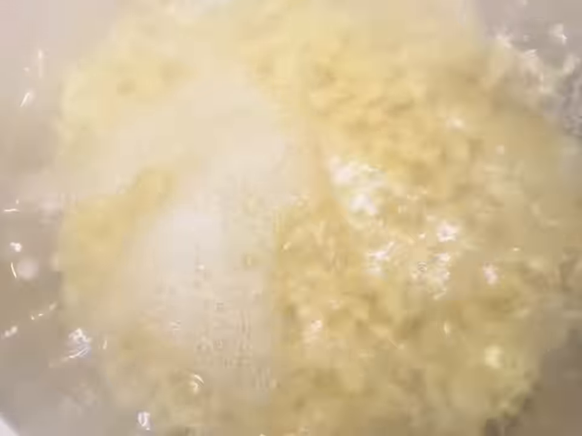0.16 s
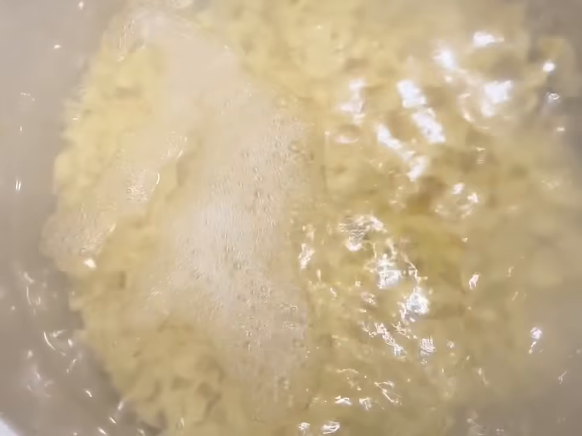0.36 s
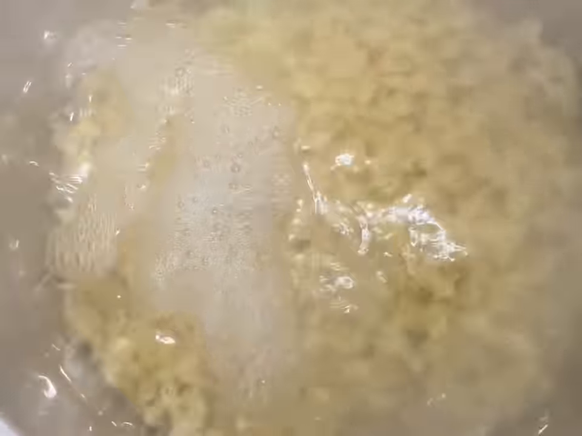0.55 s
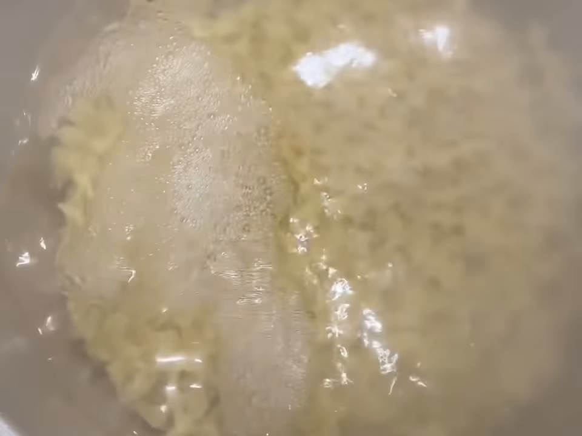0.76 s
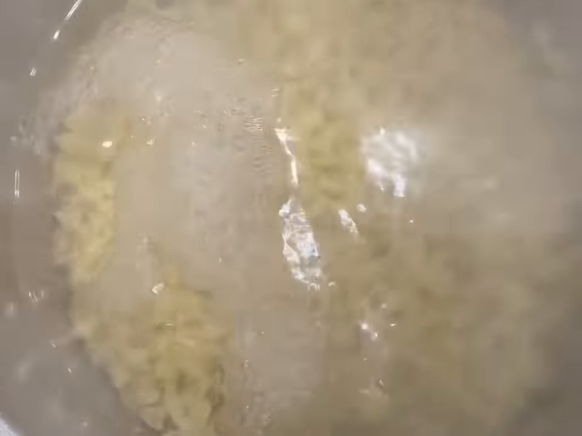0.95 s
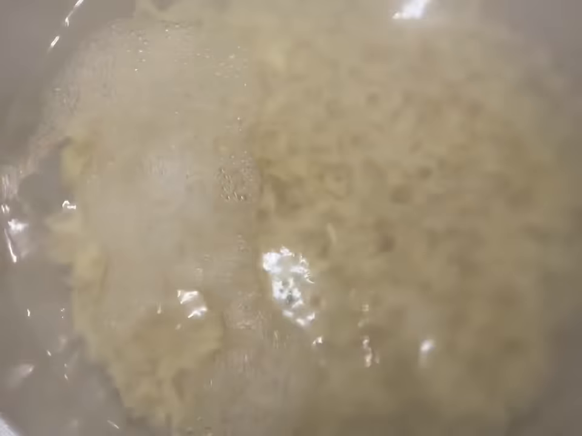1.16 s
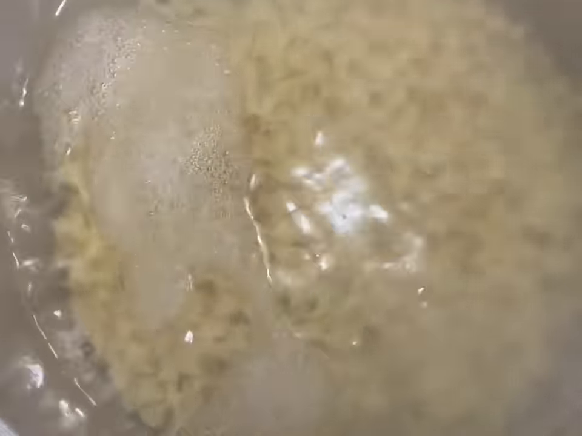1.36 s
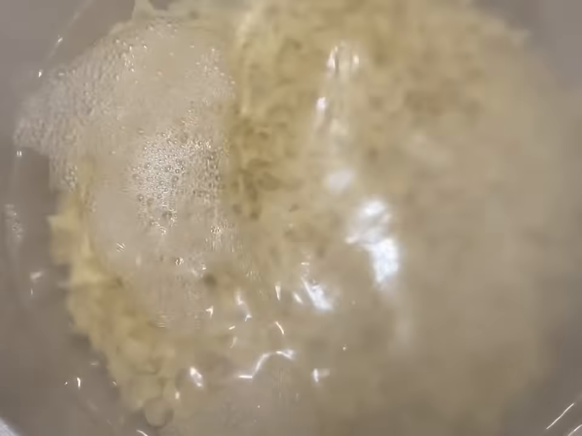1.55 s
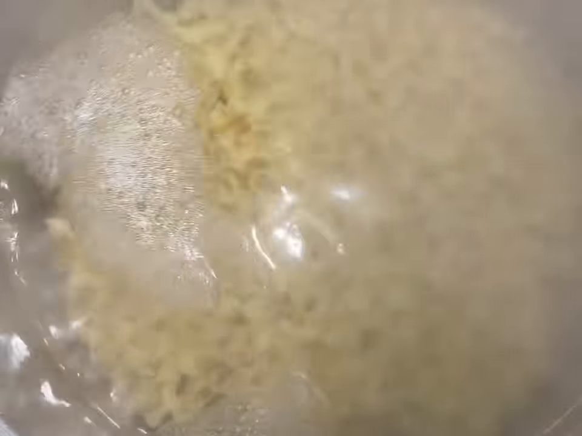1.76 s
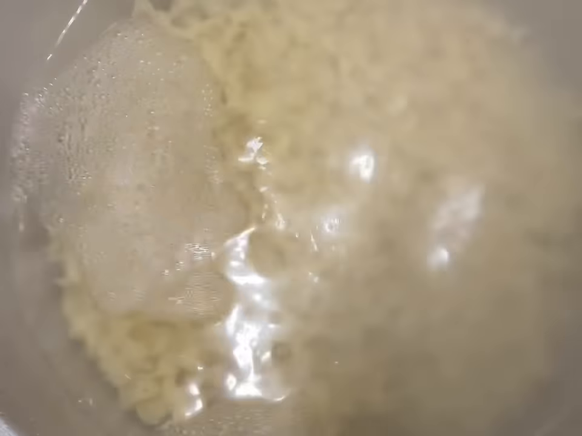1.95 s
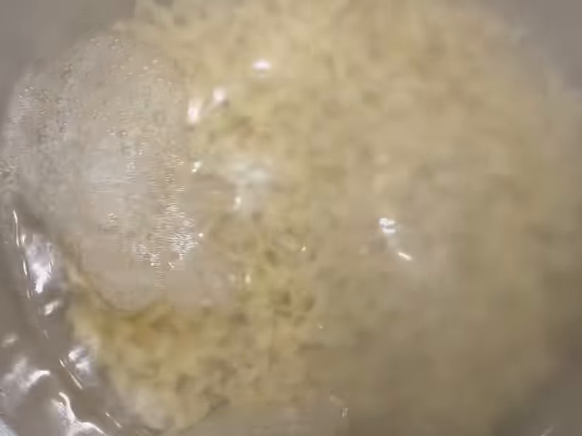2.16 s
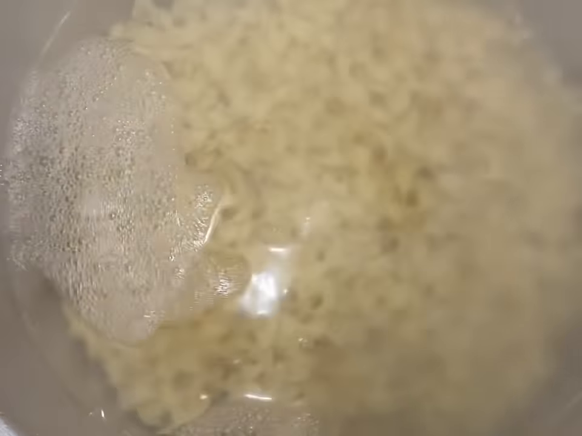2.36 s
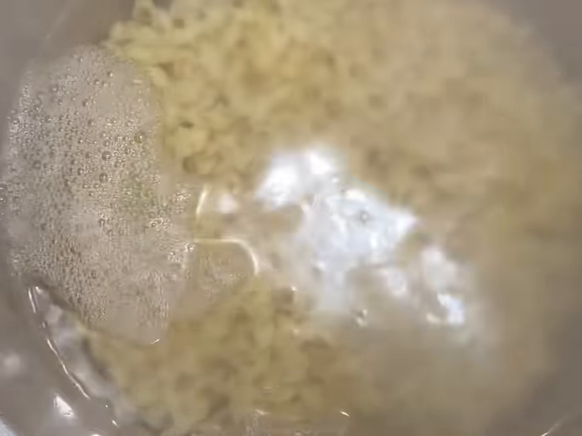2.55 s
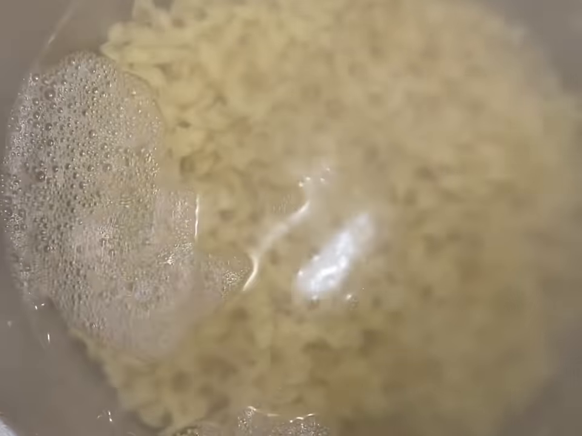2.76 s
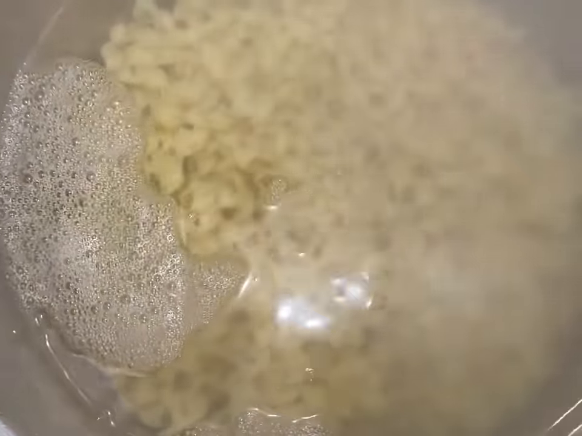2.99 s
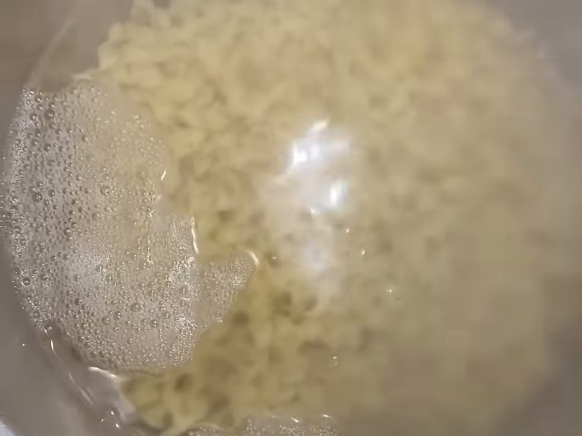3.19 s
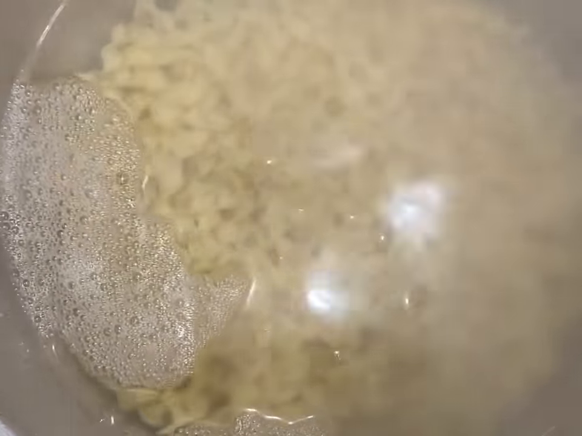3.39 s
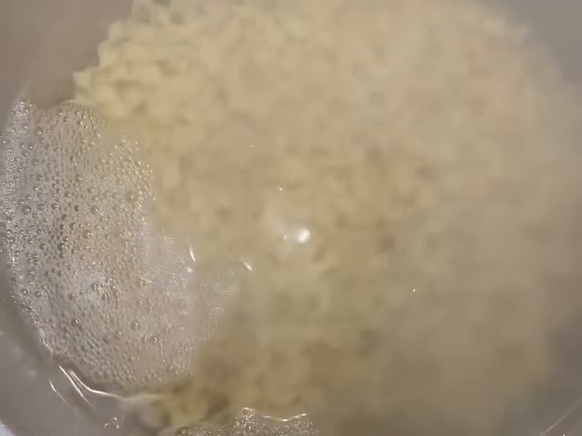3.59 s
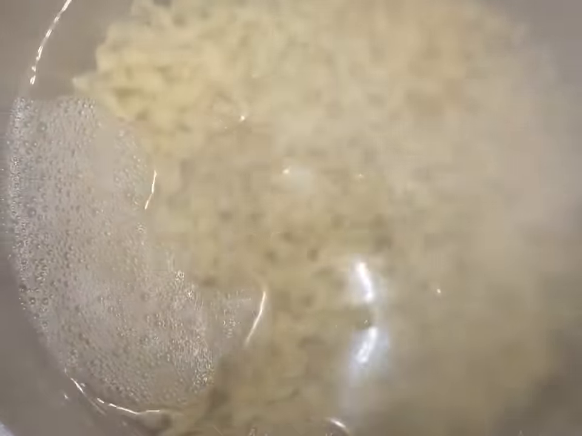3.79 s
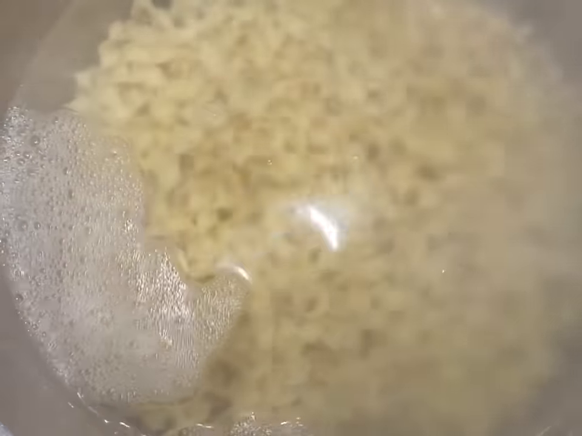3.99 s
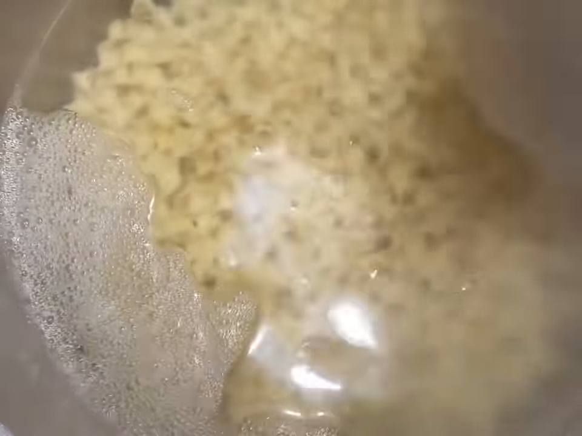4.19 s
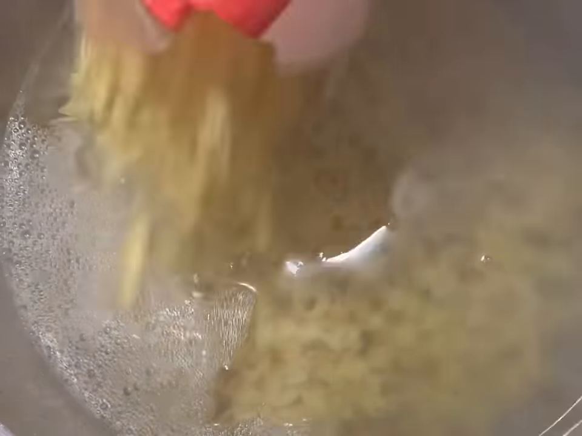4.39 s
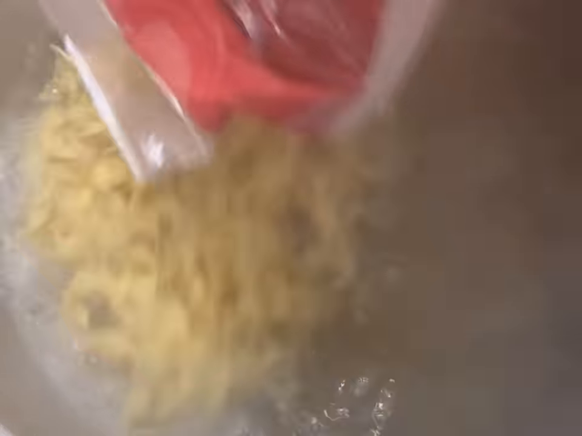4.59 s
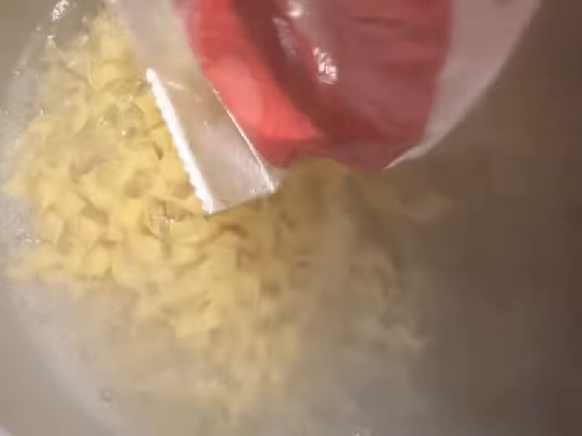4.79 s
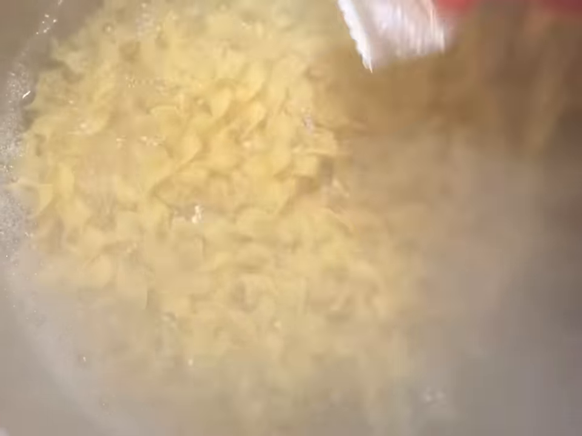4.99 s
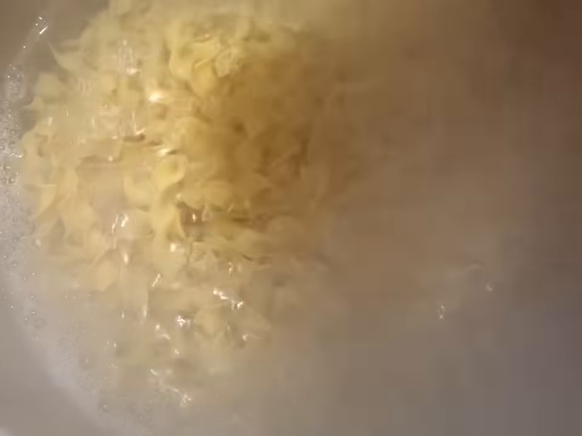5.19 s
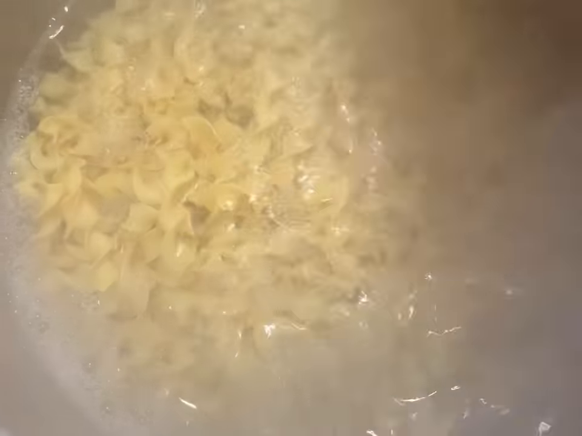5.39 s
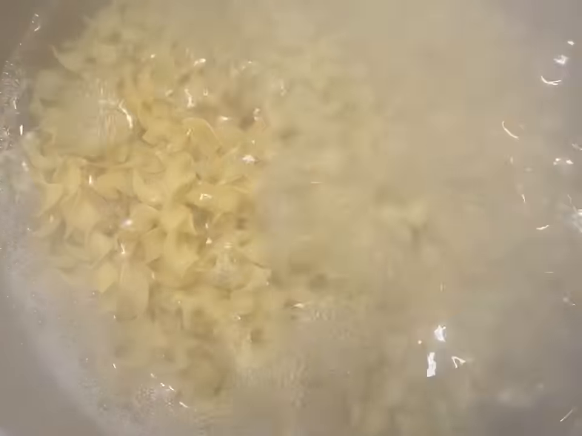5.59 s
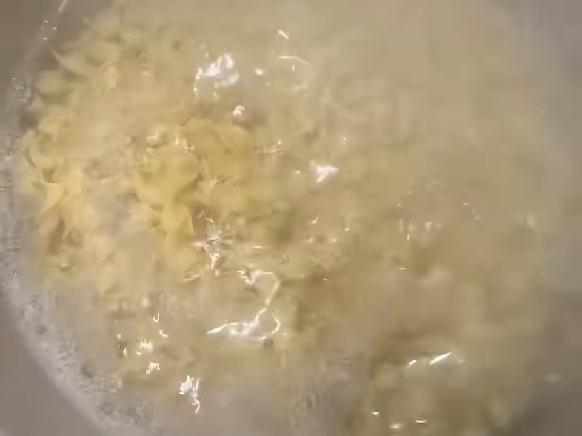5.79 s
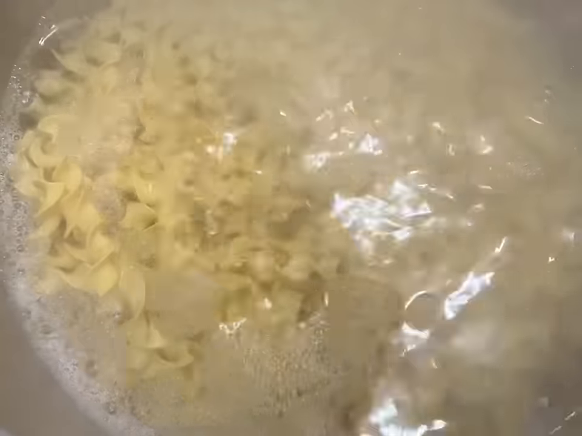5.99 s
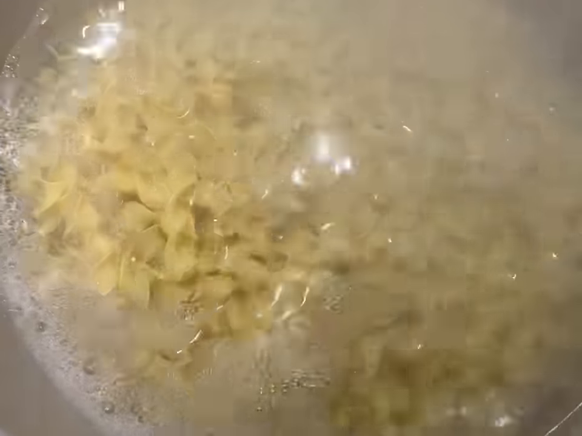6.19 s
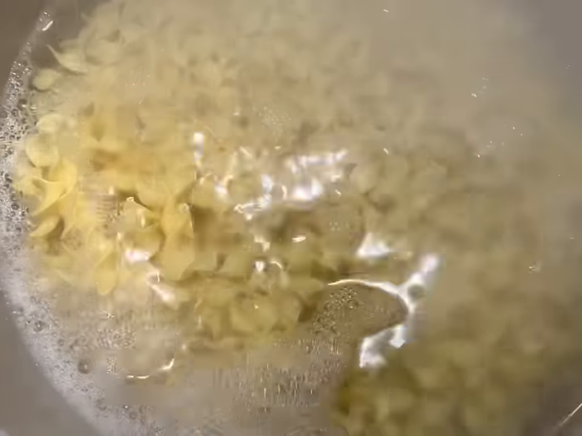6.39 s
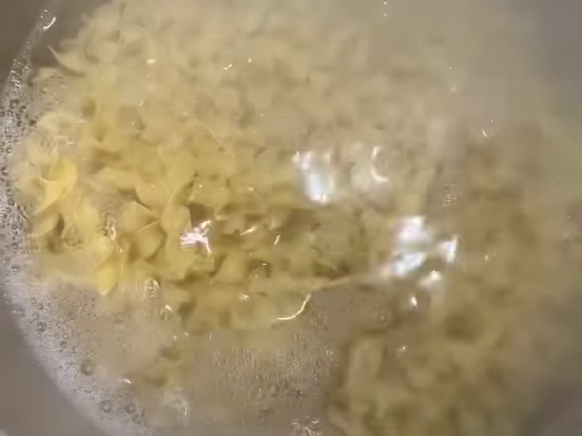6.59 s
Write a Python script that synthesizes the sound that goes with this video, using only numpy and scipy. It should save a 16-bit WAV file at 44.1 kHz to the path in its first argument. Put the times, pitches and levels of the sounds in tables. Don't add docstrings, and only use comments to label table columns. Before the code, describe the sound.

In a small home kitchen with a low fan hum and faint water fizz, a thin plastic bag is handled to one side, rustling with sharp crackling snaps and one soft bump. After four seconds dry noodles rush out in a loud bright rattle, with brief bubbly splashes in the pot, stopping abruptly. The empty bag crinkles more quietly. The stereo microphone is close above the pot.

```python
import sys
import numpy as np
from scipy import signal
from scipy.fft import rfft, irfft, next_fast_len
from scipy.io import wavfile
from scipy.ndimage import uniform_filter1d, map_coordinates

SR = 44100
rng = np.random.default_rng(int(sys.argv[2]) if len(sys.argv) > 2 else 0)


def unload_audio(sound):
    columns = np.transpose(np.atleast_2d(sound))
    steps = np.round(np.clip(columns, -1, 1) * 32767)
    wavfile.write(sys.argv[1], SR, steps.astype(np.int16))


def ratio_of_db(decibels):
    return 10 ** (np.asarray(decibels, float) / 20)


N = 293265


def unit(x):
    return x / np.sqrt(np.mean(x ** 2) + 1e-20)


def peaked(x):
    return x / np.max(np.abs(x))


def along(points, hz):
    f, v = np.transpose(points)
    return np.interp(np.log(hz + 1), np.log(f + 1), v)


def curves(rows):
    s, *cols = np.transpose(rows)
    return [np.interp(np.arange(N) / SR, s, c) for c in cols]


def wobble(rate):
    coarse = np.arange(0, N + 32, 32)
    knots = rng.standard_normal(int(N * 200 / SR) + 4)
    return np.interp(np.arange(N), coarse, map_coordinates(knots, [coarse * rate / SR]))


def filtered(x, response):
    m = next_fast_len(N + SR // 2)
    return irfft(rfft(x, m) * response(np.fft.rfftfreq(m, 1 / SR)), m)[..., :N]


def resonant(modes, share):
    def response(f):
        ringing = sum(ratio_of_db(db) * 1j * f * w / (c * c - f * f + 1j * f * w) for c, w, db in modes)
        return 1 + share * ringing
    return response


def rung(x, hz, sharpness):
    pole = np.exp(-np.pi * hz / sharpness / SR)
    feedback = [1, -2 * pole * np.cos(2 * np.pi * hz / SR), pole ** 2]
    return signal.lfilter([1 - pole, 0, pole - 1], feedback, x)


def grains(count, span, centre_hz, octaves, cycles, spread_db, size=48):
    seconds = span[1] - span[0]
    start = ((span[0] + rng.random(count) * seconds) * SR).astype(int)
    hz = np.clip(centre_hz * 2 ** (octaves * rng.standard_normal(count)), 40, .42 * SR)[:, None]
    strength = ratio_of_db(spread_db * np.minimum(rng.exponential(size=count), 4.5))[:, None]
    phase = rng.random(count)[:, None]
    t = np.arange(size) / SR
    shape = np.sin(2 * np.pi * (hz * t + phase)) * np.exp(-hz * t / cycles) * np.hanning(2 * size)[size:]
    places = start[:, None] + np.arange(size)
    x = np.bincount(places.ravel(), (shape * strength).ravel(), N + size)[:N]
    return unit(x) * np.sqrt(seconds * SR / N)


def swells(rows):
    power = np.zeros(N)
    for s, db, rise_s, fall_s in rows:
        since = np.arange(0, N + 32, 32) / SR - s
        level_db = db - 20 * np.maximum(since / fall_s, -since / rise_s) ** 1.2
        power += np.repeat(ratio_of_db(2 * level_db), 32)[:N]
    return np.sqrt(uniform_filter1d(power, size=64).clip(0))


# frequency in Hz, t60 in seconds.
WALLS = [(200, 0.21), (2000, 0.12), (10000, 0.066)]


def scattered(x, t60_scale, size):
    hz, _, z = signal.stft(x * 1., SR, nperseg=size)
    keep = ratio_of_db(-2 * 60 * size / 2 / SR / (t60_scale * along(WALLS, hz)))
    power = np.array([signal.lfilter([1 - k], [1, -k], row) for k, row in zip(keep, np.abs(z) ** 2)])
    phases = np.exp(2j * np.pi * rng.random(z.shape))
    copy = signal.istft(np.sqrt(power) * phases, SR, nperseg=size)[1][:N]
    return unit(copy) * np.sqrt(np.mean(x * x))


def placed(x, alike, wet_db, scatter, size=128):
    answer = scattered(np.arange(SR // 3) == 300, 1, size=128)
    shared = x + ratio_of_db(wet_db) * signal.fftconvolve(x, answer)[:N]
    apart = scattered(shared, scatter, size=size)

    def shares(hz):
        turn = np.arccos(np.clip(along(alike, hz), -1, 1)) / 2
        return np.array([np.cos(turn), np.sin(turn)])
    mid, side = filtered(np.array([shared, apart]), shares)
    return np.array([mid + side, mid - side])


# frequency in Hz, level in dB rms, unsteadiness in dB.
FAN = [(58, -42.5, 2), (119.7, -47, 2.5), (409, -61, 1), (905, -60, 1.5)]


def fan():
    t = np.arange(N) / SR
    hum = np.zeros(N)
    for hz, db, shaky_db in FAN:
        level = np.sqrt(2) * ratio_of_db(db + shaky_db * wobble(14))
        hum += level * np.sin(2 * np.pi * hz * t + 0.77 * wobble(6.4))
    return hum


# frequency in Hz, level in dB per Hz.
AIR_COLOUR = [(25, 3), (64, 10), (86, -6.5), (122, -7.5), (201, -17), (410, -18), (528, -21), (565, -26.5),
              (835, -24.5), (6000, -45),
              (9000, -47), (15000, -75)]


def kitchen_air():
    fizz = grains(count=5000, span=(0, N / SR), centre_hz=2920, octaves=1.2, cycles=3.0, spread_db=-4.0, size=64)
    air = ratio_of_db(0.29 * wobble(6.9)) * rng.standard_normal(N) + 0.19 * fizz

    def colour(hz):
        low_cut = (hz > 30) / (1 + (130 / (hz + 1)) ** 2)
        return ratio_of_db(along(AIR_COLOUR, hz)) * low_cut
    return ratio_of_db(-45.5) * unit(filtered(air, colour))


# peak in seconds, rustle in dB, rise and fall over 20 dB in seconds,
# brightness in dB.
SQUEEZES = [(0, -45.5, .1, 0.22, -1), (.62, -37, 0.26, 1, -4), (.748, -31, 0.068, 0.13, 3.5),
            (.9, -33.5, 0.1, 0.42, 4), (1.35, -39.5, 0.039, 0.26, 4), (1.42, -37.5, 0.055, 0.23, 0),
            (1.6, -33.5, 0.039, 0.1, -4), (1.81, -30, 0.041, 0.44, 1.5), (2.0, -45.5, 0.41, 0.19, 9),
            (2.17, -37.5, 0.19, 0.3, 1.5), (2.46, -27.5, 0.036, 0.31, 2.5),
            (2.535, -25.5, 0.17, 0.075, 4.5), (2.75, -28, 0.153, 0.26, 4.5), (2.97, -28.5, 0.25, 0.21, 2.5),
            (3.25, -30.5, 0.32, 0.2, 4.5), (3.37, -24, 0.041, 0.19, 0), (3.5, -33, 0.24, 0.52, -1),
            (3.86, -34.5, 0.27, 0.27, -2), (4.18, -29.5, 0.16, 0.23, -5), (4.32, -18, 0.1, 0.53, 1.5),
            (4.91, -40.5, 0.066, 0.15, 26.5), (6.15, -34, 0.25, 0.33, -4.5),
            (6.228, -33.5, .025, 0.47, 0.5), (6.31, -36.5, 0.11, 0.091, 1.5), (6.52, -37, .08, 0.96, -5)]
# peak in seconds, rustle in dB.
FLICKS = [(.027, -50), (.162, -54), (.29, -39.5), (.33, -33.5), (.495, -48), (0.661, -30), (1.332, -40.5),
          (1.575, -39.5), (2.262, -39.5), (2.415, -48), (3.13, -33.5), (3.6, -34), (3.705, -34.5),
          (5.135, -46.5), (5.254, -47.5), (5.345, -43.5), (5.382, -45), (5.5, -43.5), (5.601, -34.5),
          (5.643, -37), (5.76, -40.5), (5.93, -40), (6.05, -55), (6.135, -30.5), (6.588, -42), (6.65, -40)]


def handling():
    flick_rise_s, flick_fall_s, flick_bright_db = 0.0095, 0.14, 0
    moves = [*SQUEEZES, *[(s, db, flick_rise_s, flick_fall_s, flick_bright_db) for s, db in FLICKS]]
    body = swells([row[:4] for row in moves])
    treble = swells([(s, db + bright_db, rise_s, fall_s / 1.18) for s, db, rise_s, fall_s, bright_db in moves])
    return body, treble


# frequency in Hz, level in dB.
FILM = [(150, -10), (300, 4), (700, 0), (1100, -3), (2000, 1.5), (2900, -1.5), (4500, -4.5), (8000, -7.5),
        (12000, -16), (15500, -21.5), (17000, -24)]
# frequency in Hz, width in Hz, level in dB.
HOLLOW = [(1060, 120, 7), (1470, 16, -0.5), (1890, 210, -5), (2530, 35, 1.5)]


def rustle():
    body_gain, treble_gain = handling()
    span = (0, N / SR)
    folds = grains(count=19000, span=span, centre_hz=4500, octaves=1.32, cycles=0.42, spread_db=2.0)
    panels = grains(count=4500, span=span, centre_hz=2330, octaves=0.703, cycles=6.5, spread_db=2.0, size=220)
    evened = filtered(folds, lambda hz: 1 / (0.87 + 1 / (1 + (hz / 9000) ** 2)))
    sliding = evened + 0.87 * rng.standard_normal(N) + 0.36 * panels
    clumps = ratio_of_db(2.67 * np.tanh(wobble(80)))
    hollow = resonant(HOLLOW, share=.55)
    film = unit(filtered(clumps * sliding, lambda hz: ratio_of_db(along(FILM, hz)) * hollow(hz)))
    treble = filtered(film, lambda hz: 1 / (1 + (3300 / (hz + 1)) ** 3))
    return ratio_of_db(-1.5) * (body_gain * (film - treble) + ratio_of_db(4.5) * treble_gain * treble)


# start in seconds, ring in dB, ring in Hz, edge in dB.
TURNED = [(.0054, -18, 1730, -47), (.2406, -26.5, 910, -60), (.2556, -26.5, 2000, -53),
          (.2895, -31, 1870, -27.5), (.3297, -14.5, 2190, -11.5), (.3384, -11, 2270, -13),
          (.4193, -17, 1650, -24), (.4935, -19.5, 1680, -37), (.543, -17.5, 1900, -34),
          (.567, -17, 2720, -31), (.5854, -17.5, 1670, -26), (.625, -18, 1130, -40),
          (.6606, -11.5, 3320, -34), (.743, -10.5, 1790, -43), (.8007, -13.5, 2080, -24),
          (.8505, -28, 1870, -21), (.9118, -11.5, 1870, -30), (.985, -12, 1890, -21),
          (1.332, -47, 1870, -28), (1.5712, -27, 1820, -33), (1.7856, -18, 3170, -41),
          (2.0442, -22, 4590, -39), (2.179, -16.5, 1790, -47), (2.4101, -30, 1350, -34),
          (2.672, -12, 1730, -22), (2.8567, -29, 1770, -24), (2.8956, -10, 2560, -32),
          (3.0118, -14.5, 2590, -26), (3.0469, -18, 1610, -18), (3.109, -15, 1530, -42)]
# start in seconds, ring in dB, ring in Hz, edge in dB.
TIPPED = [(3.278, -19, 1080, -30), (3.3376, -30.5, 1550, -19), (3.3571, -10, 1515, -14),
          (3.4865, -11, 1910, -15), (3.5926, -20, 2540, -33), (3.6169, -16.5, 2050, -27),
          (3.706, -22, 1620, -28), (3.717, -24, 494, -47), (3.728, -18.5, 1380, -22),
          (3.8489, -28, 4160, -18.5), (4.0305, -28, 2820, -47.5), (4.097, -20, 1220, -35),
          (4.1223, -11, 2750, -16.5), (4.152, -13.5, 2820, -11), (4.1709, -11.5, 2960, -8),
          (4.247, -6.5, 2630, -7), (4.2614, -14, 2070, -26), (4.286, -12, 5100, -1.5),
          (4.3298, -32, 1470, -6), (4.633, -7.5, 1640, -12), (4.675, -12, 4500, -4), (4.817, -16, 5950, -5),
          (4.871, -20, 5700, -6), (4.921, -22.5, 2050, -2.5), (4.998, -33, 4240, -13),
          (5.023, -29, 2140, -5), (5.0304, -11.5, 2136, -12)]
# start in seconds, ring in dB, ring in Hz, edge in dB.
EMPTY = [(5.137, -17.5, 1660, -38), (5.294, -30, 1970, -50), (5.3435, -25, 2140, -27),
         (5.3918, -18.5, 1610, -35), (5.474, -28.5, 4400, -29), (5.4979, -20, 1920, -30.5),
         (5.5695, -26, 1210, -54), (5.5968, -17.5, 2060, -26), (5.6037, -22, 2180, -23),
         (5.6458, -17, 2900, -16.5), (5.7343, -21, 2560, -35), (5.7596, -23, 2520, -11.5),
         (5.8398, -27.5, 2150, -49), (5.9312, -26, 5800, -20), (5.995, -20.5, 2210, -17.5),
         (6.0458, -17, 2390, -43), (6.135, -17, 1870, -18.5), (6.2195, -14.5, 1960, -32),
         (6.2583, -9.5, 4250, -16.5), (6.267, -12, 1880, -26), (6.2869, -8, 995, -35),
         (6.308, -10, 1830, -14), (6.3692, -18.5, 2520, -18), (6.487, -16, 1520, -28),
         (6.501, -21, 1210, -26), (6.5202, -11, 1760, -42), (6.5355, -18.5, 1700, -29),
         (6.579, -14, 3300, -19), (6.6486, -6.5, 2700, -28)]


def snaps():
    out, t = np.zeros(N + SR), np.arange(SR // 12) / SR
    flip = 4 * (t == 0)
    for rows, flurry_t60 in [(TURNED, 0.076), (TIPPED, 0.12), (EMPTY, 0.056)]:
        for s, ring_db, hz, edge_db in rows:
            noise = rng.standard_normal((3, len(t)))
            flurry = noise[0] * np.abs(noise[1]) * ratio_of_db(-60 * t / flurry_t60) + 1.26 * flip
            ring = peaked(rung(flurry, hz, sharpness=7.9) + 0.44 * rung(flurry, 1140, sharpness=0.47))
            edge = peaked(rung(noise[2] * ratio_of_db(-60 * t / 0.02) + flip, 8320, sharpness=3.8))
            out[round(s * SR):][:len(t)] += ratio_of_db(ring_db - 4.5) * ring + ratio_of_db(edge_db - 3.0) * edge
    return out[:N]


# start in seconds, level in dB, pitch in Hz.
PINGS_BAG = [(0.0045, -24, 2180), (0.006, -24, 1620), (0.0254, -42, 5650), (0.24, -47, 5500),
             (0.2544, -47, 5120), (0.2559, -42, 4090), (0.2609, -38, 1940), (0.3282, -29, 6600),
             (0.3282, -20, 2110), (0.3287, -27.5, 1160), (0.3372, -31, 5760), (0.3377, -31, 3660),
             (0.3377, -22, 2360), (0.3472, -28, 3730), (0.3482, -35, 2290), (0.4924, -30, 4150),
             (0.4934, -30, 1620), (0.5009, -37, 3800), (0.5507, -28, 960), (0.5847, -33, 4610),
             (0.6221, -26, 930), (0.659, -31, 2030), (0.66, -35, 5620), (0.66, -25, 3850),
             (0.6605, -28, 3270), (0.6695, -31, 4780), (0.671, -31, 3230), (0.7418, -22, 1810),
             (0.7453, -31, 5000), (0.7463, -32, 6030), (0.7493, -36, 1830), (0.7493, -25, 2370),
             (0.7563, -26, 1790), (0.9174, -33, 1900), (0.9858, -27, 3930), (0.9902, -35, 1670),
             (0.9927, -27, 3300), (1.7854, -30, 3140), (1.8243, -27, 1890), (2.1361, -30, 4200),
             (2.178, -25.5, 1820),
             (2.435, -28, 3750), (2.4459, -23, 1890), (2.4569, -21, 1840), (2.4684, -23, 1860),
                (2.506, -28, 1870), (2.5121, -21, 3260), (2.5478, -24, 1560), (2.6704, -33, 5100),
                (2.7028, -21, 1720), (2.7507, -34, 3240), (2.7584, -24, 2650), (2.824, -25, 1470),
                (2.8959, -32, 4930), (2.903, -32, 3680), (2.9044, -25, 2300), (2.9598, -25, 2330),
                (2.9832, -27.5, 2200), (2.9957, -26, 1490), (3.1286, -25, 1610), (3.1379, -24, 1930),
                (3.1439, -24, 870), (3.1794, -25, 1030), (3.2052, -23, 3070), (3.2386, -28, 5600),
                (3.2973, -31, 1620), (3.348, -21, 995), (3.3609, -17.5, 1570), (3.374, -27, 3420),
                (3.3743, -35, 1920), (3.3783, -32, 6300), (3.4463, -23, 2470), (3.4854, -34, 1800),
                (3.4926, -25, 4180), (3.522, -31, 1920), (3.5814, -31, 1870), (3.6173, -27, 2020),
                (3.6612, -34, 4220), (3.662, -29, 1890), (3.679, -31, 5900), (3.7085, -25.5, 465),
                (3.7146, -27, 590), (3.731, -28, 5640), (3.7325, -27, 1890), (3.8153, -32, 2210),
                (3.8466, -34, 4160), (3.8522, -32, 5870), (3.899, -28, 460),
             (5.1348, -29, 1680), (5.138, -27.5, 1030), (5.1403, -36, 6280), (5.345, -33, 2320),
               (5.3879, -33, 856), (5.3878, -34, 1810), (5.389, -35, 4030), (5.4965, -30, 1980),
               (5.4985, -39, 4690), (5.5005, -39, 5600), (5.607, -40, 3880), (5.6472, -28, 3010),
               (5.6486, -26.5, 2530), (5.7584, -28.5, 2220), (5.9325, -35, 5540), (5.93, -29, 3450),
               (6.0516, -32, 2380), (6.0512, -30, 1650), (6.306, -34.5, 1720), (6.368, -32.5, 1800),
               (6.4858, -37, 4160), (6.5182, -23, 1810), (6.533, -25, 1650), (6.5865, -32, 6300),
             (0.5671, -29, 1790), (1.0774, -26.5, 1920), (1.4087, -33.5, 2050), (2.6254, -36, 1860),
               (2.7954, -21, 1540), (3.5034, -26, 1080), (5.691, -36.5, 1980), (5.7864, -41, 870),
               (5.9763, -37, 2200), (6.1434, -29, 1650), (6.4657, -33, 2140), (6.559, -31, 2010)]
# start in seconds, level in dB, pitch in Hz.
PINGS_POURED = [(4.1206, -27, 2700), (4.1695, -21, 5970), (4.1725, -24, 1610), (4.2463, -19, 3470),
                (4.273, -20.5, 4720), (4.2733, -15.5, 1390), (4.2927, -19, 2820), (4.3167, -15, 1750),
                (4.3366, -14, 2210), (4.3875, -15.5, 5300), (4.402, -11, 1800), (4.4229, -15, 1690),
                (4.428, -14, 2040), (4.4434, -34, 605), (4.4773, -21, 600), (4.4783, -20, 2050),
                (4.5312, -20, 2820), (4.6315, -18, 3150), (4.6365, -19, 490), (4.6664, -14, 5430),
                (4.6744, -14, 6130), (4.6754, -13, 4000), (4.7602, -15.5, 1690), (4.7662, -18, 3220),
                (4.7672, -17, 1980), (4.8629, -17.5, 425), (4.8694, -18, 2000), (4.9078, -19, 3050),
                (4.9188, -18, 1890), (4.9228, -16, 3640), (4.9453, -17, 2100), (4.9697, -14.5, 2100),
                (4.9837, -17, 2020), (4.9976, -16, 4300), (5.0216, -24, 2130), (5.0296, -21, 3000),
                (5.0321, -19, 5970)]


def pings(rows):
    attack_s, t60, waver_rad = 0.00062, 0.019, 0.32
    out, t = np.zeros(N + SR), np.arange(SR // 40) / SR
    shape = peaked((1 - np.exp(-t / attack_s)) * ratio_of_db(-60 * t / t60))
    for s, db, hz in rows:
        waver = waver_rad * np.cumsum(rng.standard_normal(len(t))) / np.sqrt(SR / 1000)
        out[round(s * SR):][:len(t)] += ratio_of_db(db) * shape * np.sin(2 * np.pi * hz * t + waver)
    return out[:N]


# start in seconds, level in dB.
TICKS = [(.371, -30), (.575, -36), (.808, -23.5), (1.09, -31), (1.825, -24), (2.419, -26), (3.085, -28),
         (3.45, -24), (3.493, -20), (3.562, -31), (3.692, -30), (3.733, -22.5), (3.863, -32), (3.896, -28),
         (4.089, -37.5), (4.837, -25), (6.141, -29), (6.229, -22), (6.383, -27), (6.586, -25), (6.62, -34)]


def ticks():
    out, t = np.zeros(N + SR), np.arange(SR // 40) / SR
    for s, db in TICKS:
        burst = rng.standard_normal(len(t)) * ratio_of_db(-60 * t / 0.038)
        spit = rung(burst, 10000, sharpness=1.1)
        out[round(s * SR):][:len(t)] += ratio_of_db(db) * peaked(spit)
    return out[:N]


# start in seconds, peak in dB, pitch in Hz, t60 in seconds.
THUDS = [
    (0.931, -11.5, 57, 0.1),
    (0.952, -19.5, 36.2, 0.24),
    (0.99, -20.5, 79, 0.058),
    (1.031, -32, 62, .3),
    (4.631, -21, 76, 0.18),
    (4.756, -14.5, 105, .09),
]


def thuds():
    out, t = np.zeros(N + SR), np.arange(SR // 3) / SR
    for s, db, hz, t60 in THUDS:
        cycles = hz * (t + 0.0045 * (1 - np.exp(-t / 0.0085)))
        level = ratio_of_db(db - 60 * t / t60) * (1 - np.exp(-t / 0.0035))
        out[round(s * SR):][:len(t)] -= level * np.sin(2 * np.pi * cycles)
    return out[:N]


# time in seconds, rattle in dB.
POUR = [
    (4.05, -50.5),
    (4.14, -37.5),
    (4.33, -20),
    (4.45, -14),
    (4.6, -20.5),
    (4.84, -20.5),
    (4.91, -18.5),
    (5.037, -28.5),
    (5.065, -70.5),
]
# frequency in Hz, level in dB.
NOODLE = [(300, -18), (800, -11.5), (1800, -10.5), (3000, -8.5), (6000, -2.5), (10000, 2), (12500, -2.5),
          (15500, -1.5), (17000, -23)]
# frequency in Hz, width in Hz, level in dB.
POT = [(534, 29, 8), (1042, 25, 5), (1410, 96, -0.5), (2050, 14, 10)]
# peak in seconds, level in dB, rise and fall over 20 dB in seconds.
SURGES = [
    (4.36, -26, 0.37, 0.42),
    (4.72, -20, 0.32, 0.25),
    (4.88, -22, 0.29, 0.096),
]


def pour():
    rattle_db, = curves([(4.0, -90), *POUR, (5.17, -92)])
    splash_db = -5.5 - 21 * np.clip(np.arange(N) / SR - POUR[2][0], -.3, 1)
    span = (4, 5.2)
    taps = grains(count=9000, span=span, centre_hz=5180, octaves=1.27, cycles=0.38, spread_db=3.8)
    clatter = grains(count=1600, span=span, centre_hz=2347, octaves=.9, cycles=16, spread_db=0.5, size=260)
    clumps = ratio_of_db(2.7 * np.tanh(wobble(90)))
    sliding = clumps * (taps + 0.94 * clatter + 0.25 * rng.standard_normal(N))
    rattle = filtered(sliding, lambda hz: ratio_of_db(along(NOODLE, hz)))
    splash = grains(count=1200, span=span, centre_hz=474, octaves=0.67, cycles=4.3, spread_db=4.5, size=800)
    surge = grains(count=220, span=span, centre_hz=115.5, octaves=0.677, cycles=3.6, spread_db=1.5, size=2200)
    body = filtered(1.3 * rattle + ratio_of_db(splash_db - 6.5) * splash, resonant(POT, share=0.81))
    return ratio_of_db(rattle_db) * body + ratio_of_db(-7.0) * swells(SURGES) * surge


# frequency in Hz, likeness from 0 to 1.
FAR_ALIKE = [(100, .999), (250, .99), (550, .96), (1200, .55), (1900, .84), (2900, 0), (3800, .45),
             (4700, .3), (6000, .7), (7600, .98), (9500, .8), (11000, .97), (12700, .97), (13800, .7),
             (15200, .98)]
# frequency in Hz, likeness from 0 to 1.
NEAR_ALIKE = [(100, .999), (250, .995), (600, .97), (1200, .74), (1900, .9), (2800, .45), (3800, .96),
              (4800, .72), (6000, .82), (7600, .98), (9500, .8), (11700, .98), (13600, .6), (15200, .98)]


def scene():
    bag_pings = pings(PINGS_BAG)
    crisp = placed(snaps() + bag_pings, FAR_ALIKE, wet_db=-9, scatter=.01, size=64)
    far = crisp + placed(rustle() + kitchen_air(), FAR_ALIKE, wet_db=-10.0, scatter=0.037)

    def lean(hz):
        return ratio_of_db(1.2 * np.exp(-np.log((hz + 1) / 1400) ** 2 / .3) * np.array([[-1], [1]]))
    pot = placed(pour() + pings(PINGS_POURED), NEAR_ALIKE, wet_db=-11.5, scatter=.04)
    thin_ticks = placed(ticks(), FAR_ALIKE, wet_db=-5, scatter=.02)
    return filtered(far, lean) + pot + thin_ticks + fan() + thuds()


def top_cut(x):
    return signal.sosfilt(signal.butter(12, 15820, fs=SR, output="sos"), x)


def record(dry):
    def ports(hz):
        lag = np.pi * np.maximum(hz - 4050, 0) / 7600
        low_cut = hz ** 4 / (hz ** 4 + 38 ** 4)
        return np.exp(1j * lag * np.array([[-1], [1]])) * (hz < 15950) * low_cut
    ported = filtered(dry, ports)
    return top_cut(ported / (1 + np.abs(ported) ** 10) ** (1 / 10))


dry = scene()
out = record(dry)
unload_audio(out)
```